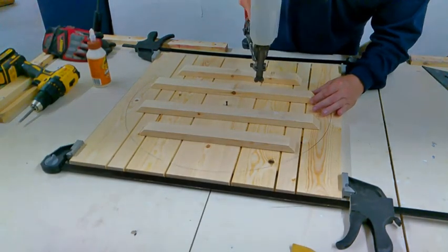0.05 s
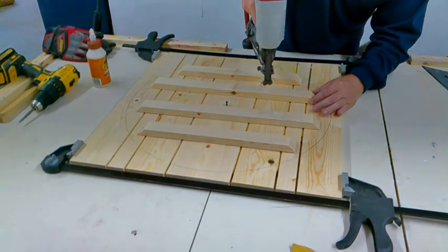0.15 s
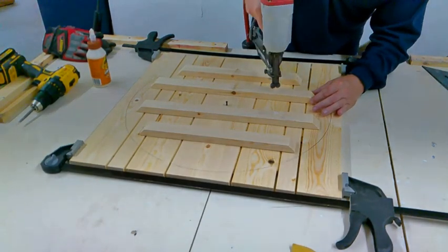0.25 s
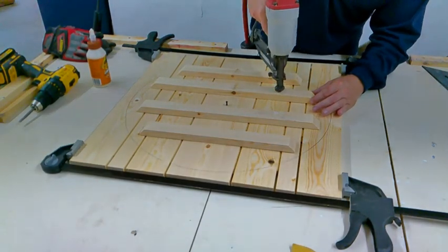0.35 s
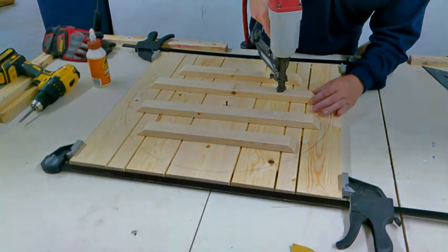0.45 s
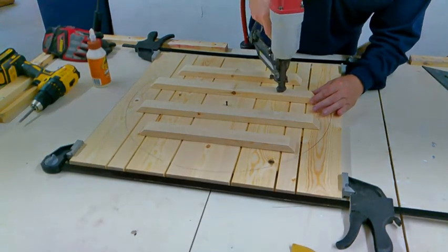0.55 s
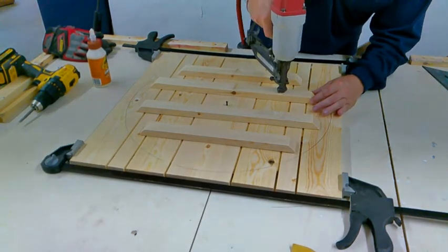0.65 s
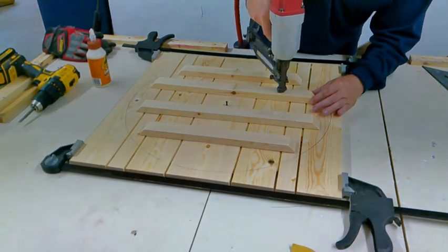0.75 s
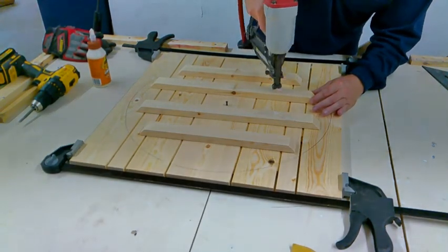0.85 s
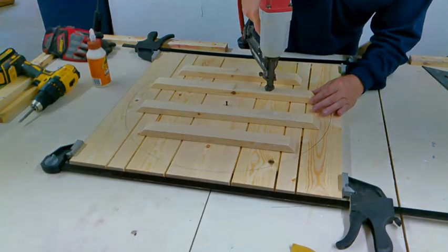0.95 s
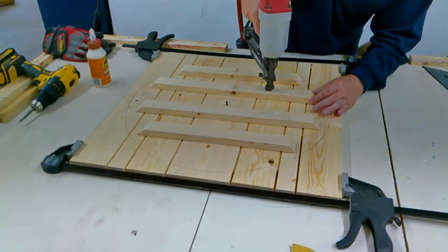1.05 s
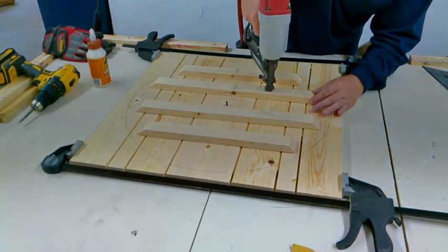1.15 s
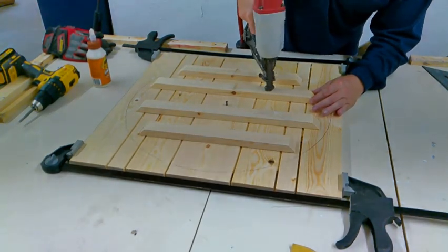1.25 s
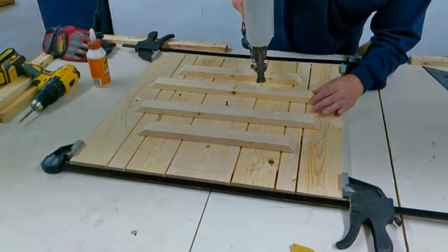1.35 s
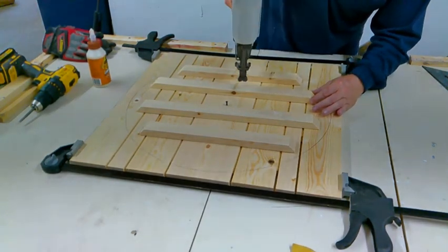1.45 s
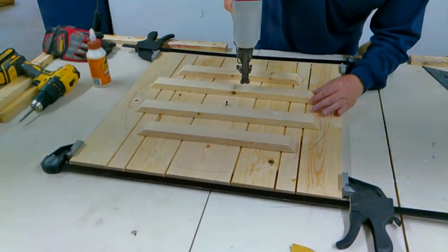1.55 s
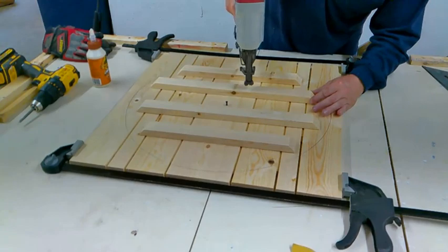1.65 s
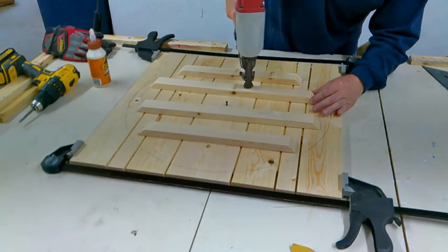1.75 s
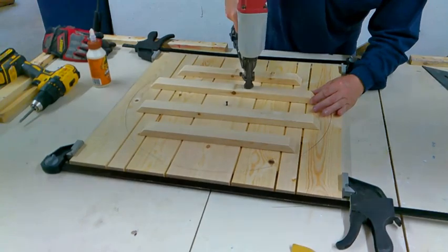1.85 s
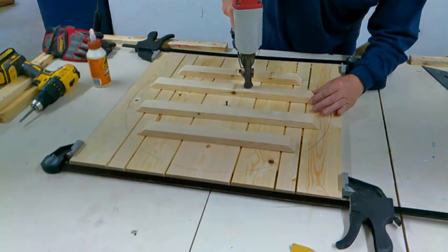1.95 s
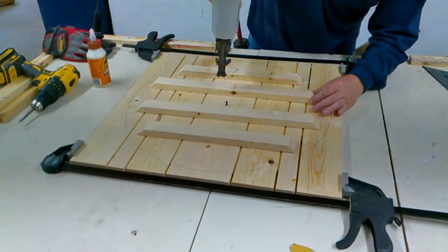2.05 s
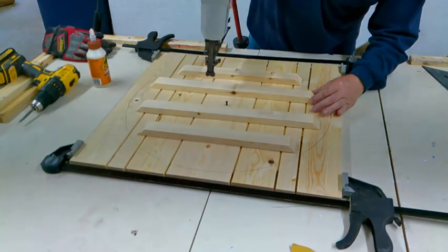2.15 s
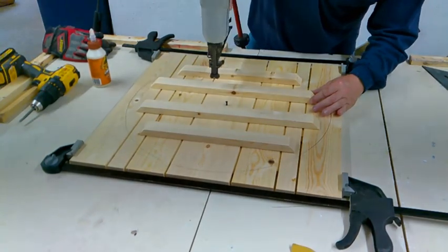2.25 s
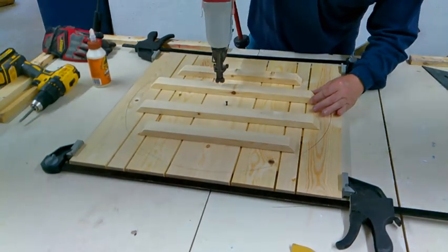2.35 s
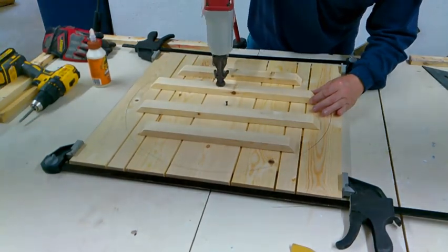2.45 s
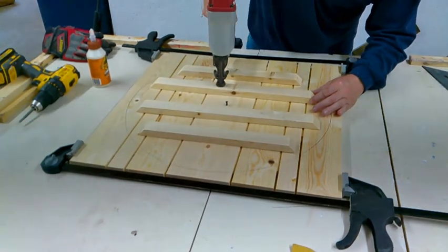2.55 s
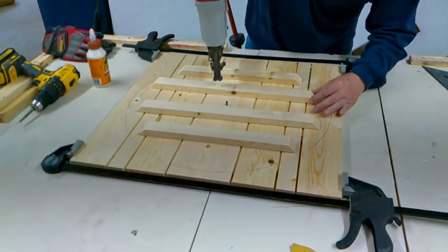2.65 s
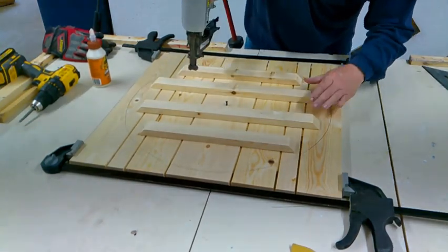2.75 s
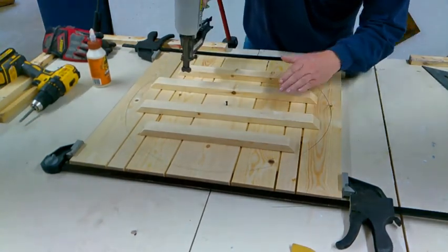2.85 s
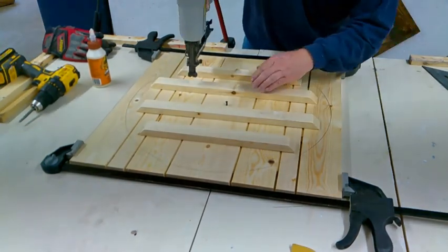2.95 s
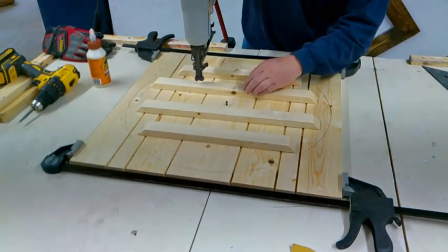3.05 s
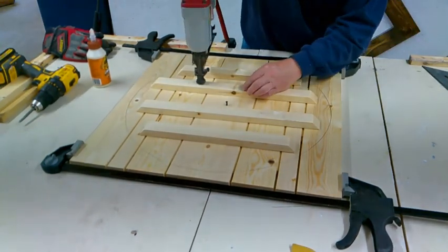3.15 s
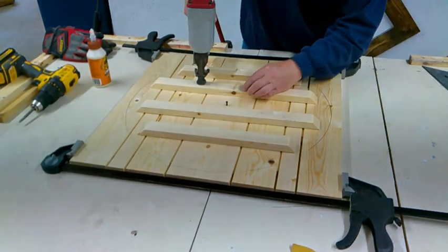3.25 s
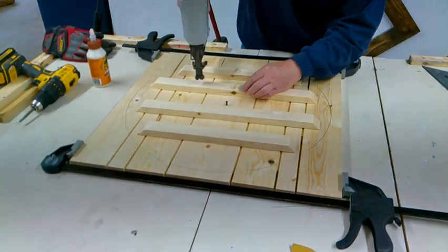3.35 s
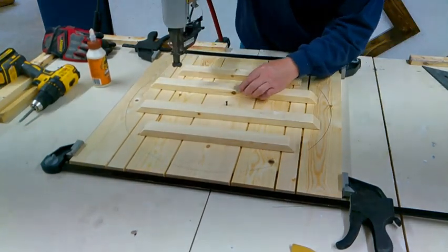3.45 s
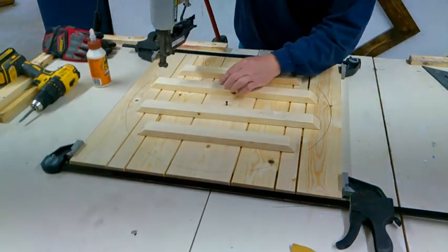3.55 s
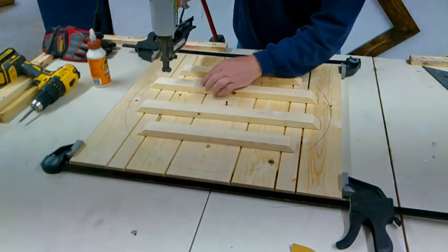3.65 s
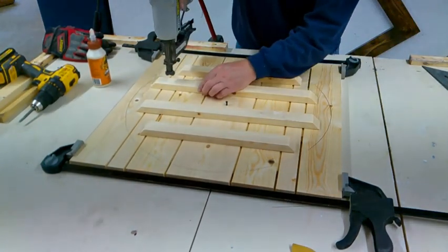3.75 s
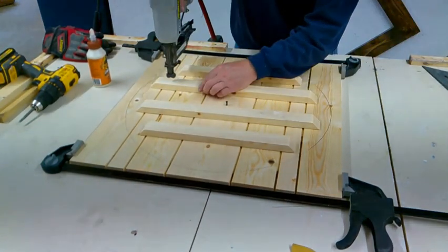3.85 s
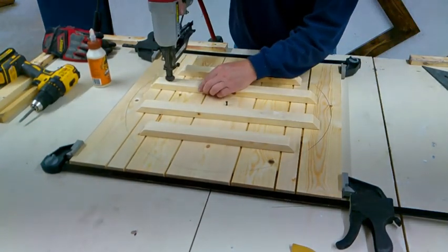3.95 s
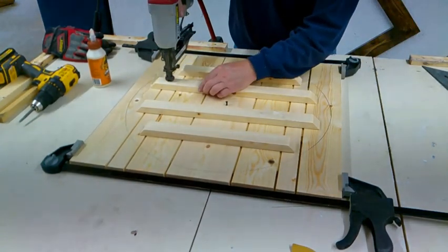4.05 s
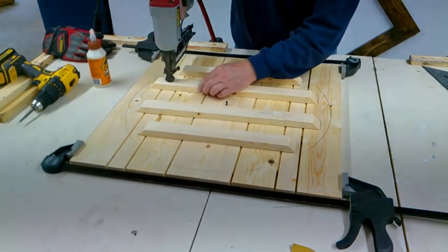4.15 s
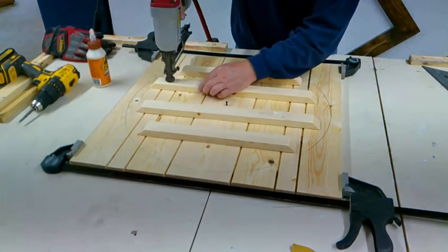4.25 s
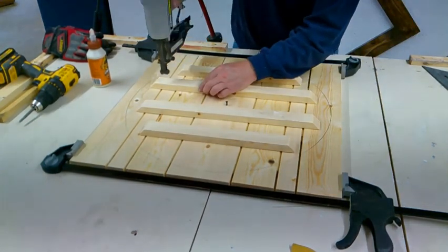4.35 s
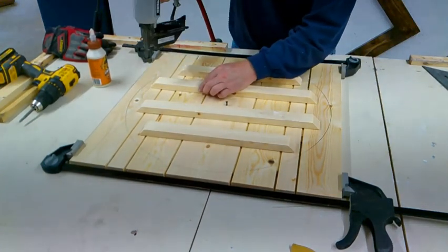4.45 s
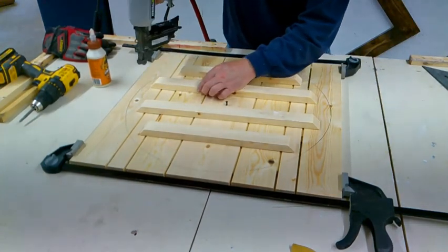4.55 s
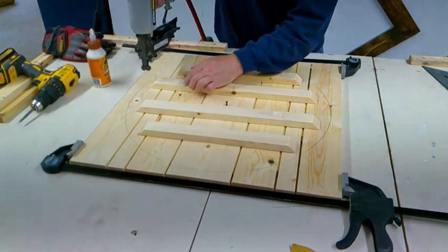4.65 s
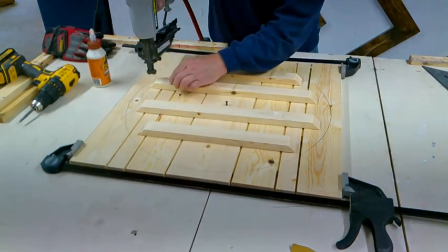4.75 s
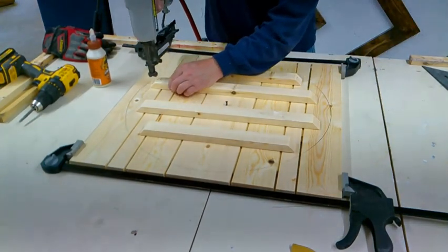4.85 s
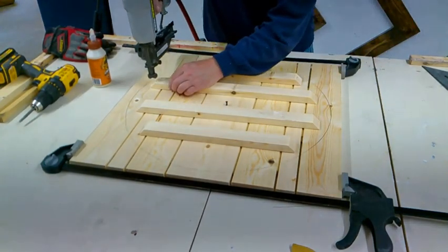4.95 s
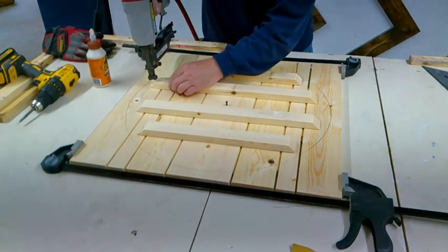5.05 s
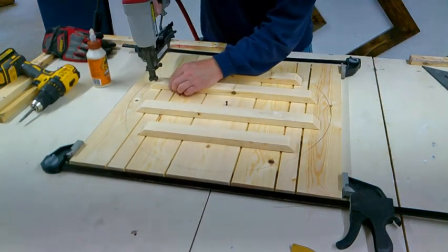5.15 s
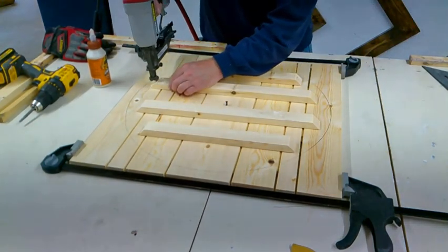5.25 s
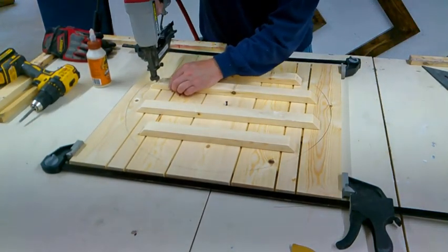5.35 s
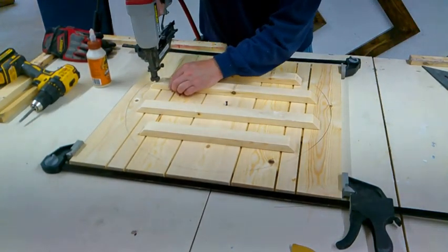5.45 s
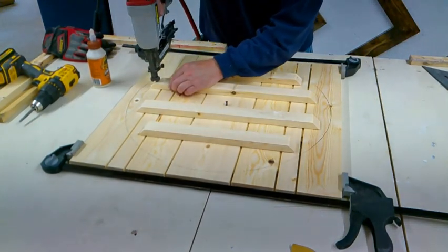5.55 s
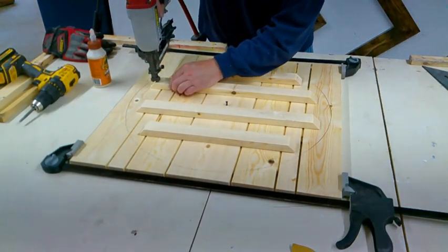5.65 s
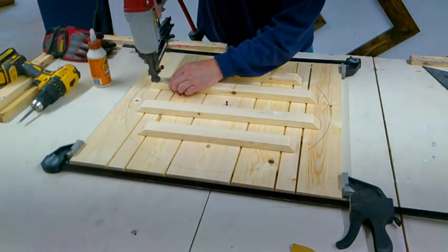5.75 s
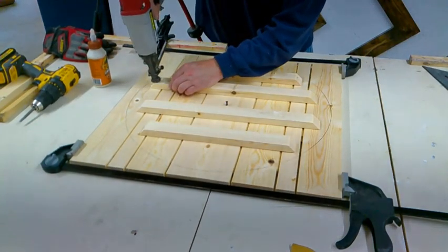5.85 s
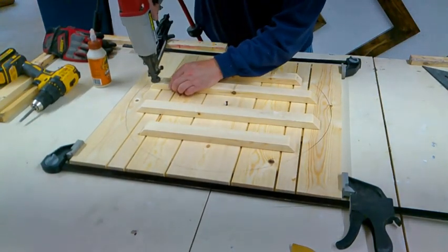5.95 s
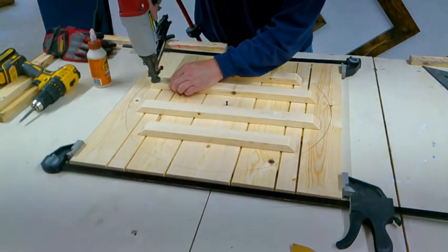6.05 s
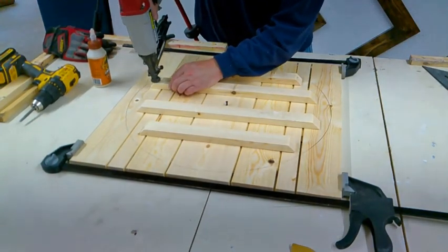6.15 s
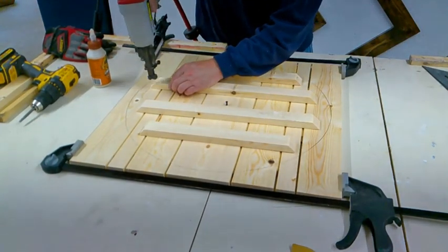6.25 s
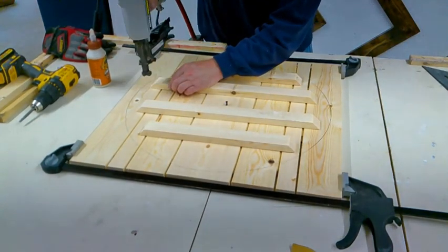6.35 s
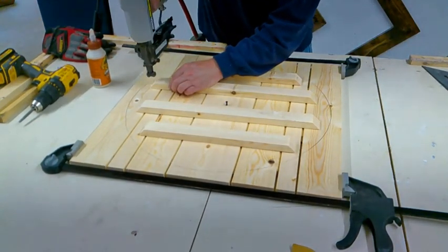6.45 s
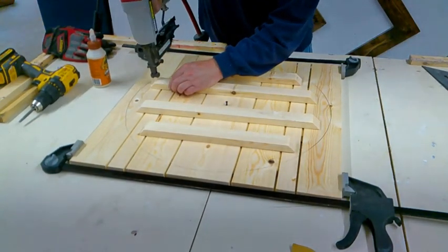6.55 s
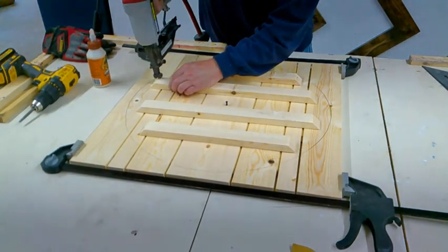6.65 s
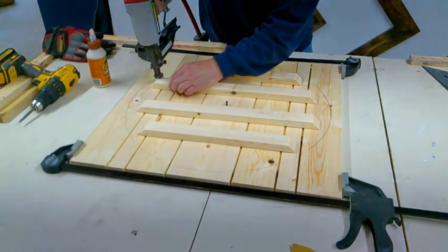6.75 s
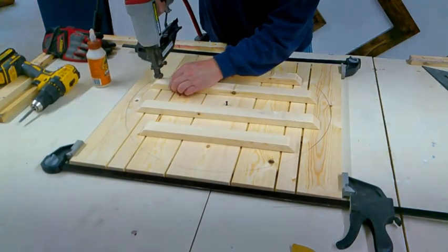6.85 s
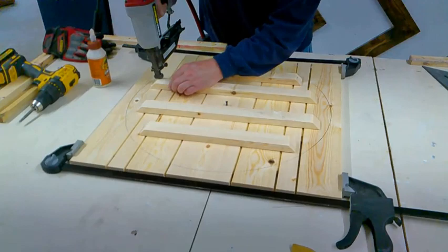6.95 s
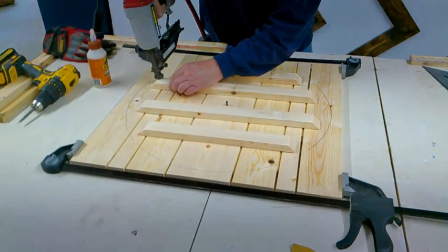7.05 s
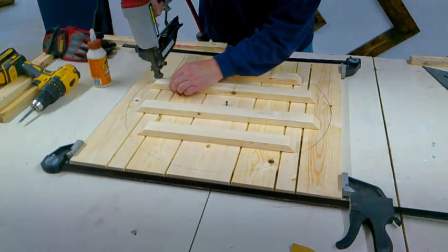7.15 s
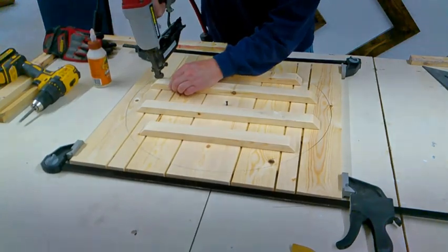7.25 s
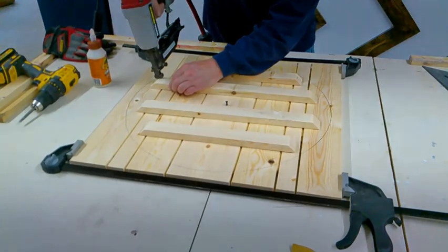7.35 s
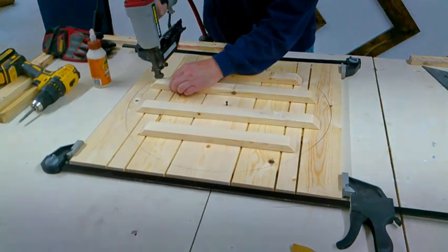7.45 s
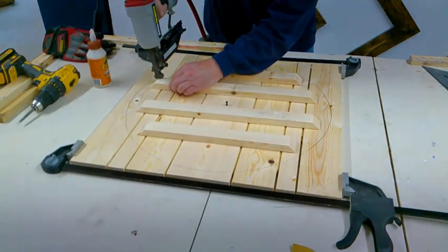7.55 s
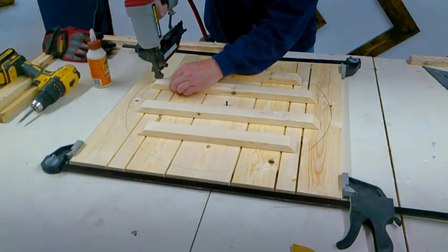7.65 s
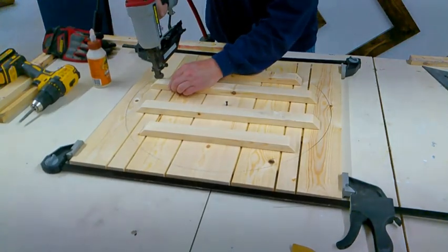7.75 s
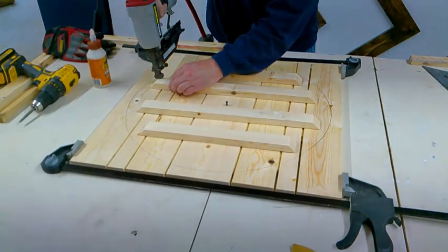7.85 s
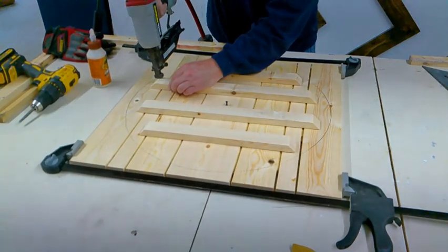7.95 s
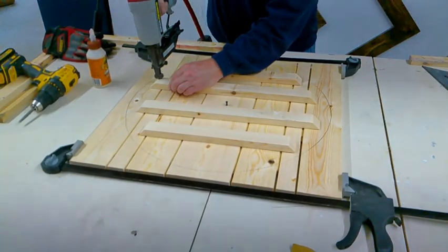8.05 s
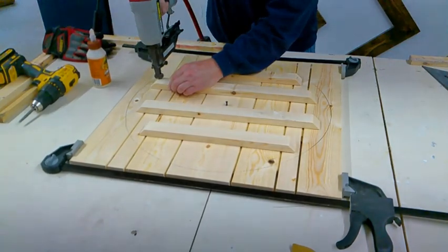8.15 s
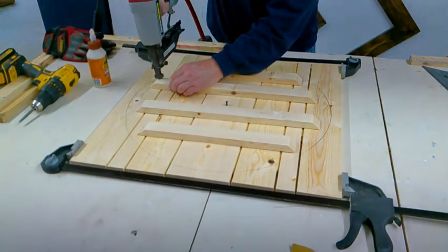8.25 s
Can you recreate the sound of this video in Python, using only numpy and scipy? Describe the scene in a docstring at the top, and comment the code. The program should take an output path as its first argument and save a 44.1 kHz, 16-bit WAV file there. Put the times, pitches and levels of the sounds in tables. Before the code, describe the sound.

Close, distorted nailer shots crack into wooden battens in a hard-walled workshop, with light nose knocks between and metallic clicks at the end.

```python
"""Pneumatic nailer in a workshop

A nailer pins pine battens to a panel on a workbench, close to the microphone, in a hard-walled workshop.
Each shot is a driver blow, a blast of exhaust air and the thump of the returning piston, all overloading the
input: shaped noise bursts, with resonances for the blow and thump. Between shots the nose knocks on the wood,
steel parts click and the bench is softly bumped, over faint mains hum and the rush of the room.
"""
import sys
import numpy as np
from scipy import signal
from scipy.fft import rfft, irfft
from scipy.io import wavfile

SR = 44100
rng = np.random.default_rng(int(sys.argv[2]) if len(sys.argv) > 2 else 0)


def to_wav(s):
    """Save 16-bit WAV."""
    ch = np.atleast_2d(s).T  # columns
    pcm = np.round(np.clip(ch, -1, 1) * 32767)  # PCM
    wavfile.write(sys.argv[1], SR, pcm.astype(np.int16))


N = 365588

# Shots, the first before time zero. Each row: nail entry in seconds, driver blow level in dB,
# time the trigger is held in seconds.
SHOTS = [(-.385, 13, 0.11), (.633, 20.5, .119), (1.170, 20, 0.11), (1.808, 20, .111), (2.487, 20.5, 0.13),
         (3.215, 20, .121), (4.187, 20, .120), (6.075, 24.5, 0.12)]
# The nose set down on the wood. Each row: contact in seconds, relative level in dB, wood note in Hz.
KNOCKS = [(.399, -23.5, 503), (1.729, -6, 333), (2.414, -12.5, 746), (3.138, -10, 784), (3.989, -18.5, 880),
          (4.135, -25.5, 970), (5.14, -31, 425), (5.425, -35.5, 418), (5.62, -38, 340), (6.881, -35.5, 299),
          (7.006, -38.5, 258), (7.188, -20.5, 242)]
# Soft bumps against the bench. Each row: start in seconds, level in dB.
BUMPS = [(7.016, -28), (7.266, -26), (7.533, -31)]
# Trigger, magazine catch and other loose steel. Each row: time in seconds, relative level in dB,
# treble tilt in dB per octave, ring in Hz.
CLICKS = [(.599, -19, -6, 1097), (1.131, -22, -4.5, 1126), (4.020, -25, -2.5, 7100), (5.141, -26, 0, 6140),
          (5.472, -43, -4, 3650), (5.872, -29, 0.5, 8900), (6.965, -31.5, 0, 9530), (7.004, -32, -5, 8000),
          (7.153, -36, -7, 3570), (7.190, 0.5, 3, 7200), (7.585, -39, 1.5, 8400), (7.788, -17, -1, 4020),
          (7.957, -21.5, -3.5, 10450), (8.06, -7, -3, 8730)]

# Resonances. Each row: centre in Hz, width in Hz, level of the resonance in dB relative to its excitation.
PANEL_MODES = [(312.8, 8.1, 1), (480, 14, -7.5), (630, 14, -4), (785, 18, -4.5), (1135.3, 20, -3),
               (1191, 16, -4.5), (1410, 20, 0.5), (1677, 18, -2)]  # pine panel and gun body
STEEL_MODES = [(2120, 260, -4.5), (2760, 150, 0), (3680, 60, 0.5), (4080, 470, 0), (5170, 100, -1),
               (6210, 80, -5), (8400, 230, 3.5), (10600, 200, -4.5)]  # small steel parts
NOSE_MODES = [(1200, 160, -2.5), (2000, 240, 0.5)]  # nose of the gun
# Mode clusters of the magazine spring. Each row: centre in Hz, width in Hz, relative peak level in dB.
SPRING_CLUSTERS = [(2400, 80, 0), (3140, 190, -2.5), (3470, 250, -3), (4324, 220, -1), (5330, 170, -5.5)]

# Noise spectra of the sources. Each row: frequency in Hz, relative level in dB per Hz.
BLOW_SPECTRUM = [(30, -10), (120, -13), (300, -7.5), (480, -7.5), (750, -3), (1120, -1.5), (1500, -3),
                 (2200, -6.5), (2800, -8.5), (4500, -10.5), (9000, -12), (12000, -19), (16000, -33.5)]  # driver blow and nail entry
RETURN_SPECTRUM = [(30, -26.5), (150, -13.5), (480, -13), (750, -1), (1120, 2), (1500, -7), (2100, -3),
                   (2800, -14), (5000, -16), (16000, -29)]  # piston at its top stop
EXHAUST_SPECTRUM = [(100, -28), (1000, -22), (2800, -8.5), (4500, -0.5), (6000, -2), (7200, -0.5),
                    (9000, 1), (12000, 1.5), (14000, -4), (16000, -5.5)]  # vented air jet
KNOCK_SPECTRUM = [(50, -10), (170, -2.5), (330, 3), (600, -1.5), (1100, 0.5), (1600, -3.5), (2200, -6.5),
                  (3500, -8), (7000, -10), (11000, -15.5), (16000, -28)]  # nose on wood
CLICK_SPECTRUM = [(100, -28), (450, -18), (900, -9.5), (1500, -2), (2200, -2.5), (4000, -5), (8000, -1),
                  (11000, -2), (13000, -9.5), (16000, -12.5)]  # steel clicks and head valve
AIR_SPECTRUM = [(25, -3.5), (100, -4), (220, -1), (450, -3), (900, -3), (1600, -9), (4000, -16.5),
                (8000, -20), (16000, -23)]  # soft rush of the room
# Mains hum. Each row: multiple of the mains frequency, level in dB rms.
HUM = [(1, -48.5), (2, -66), (3, -60.5), (5, -66)]
# Workshop reverberation. Each row: band centre in Hz, time to decay by 60 dB in seconds.
ROOM_T60 = [(60, 0.36), (300, 0.46), (1000, 0.43), (2500, 0.45), (5000, 0.42), (9000, 0.35), (15000, .25)]

MAINS_HZ, BENCH_HZ = 60, 147
TOP_HZ = 15700  # upper limit of the recorded band
LEAD = SR // 2  # samples of run-up, so that an earlier shot is still dying away
SPAN = 2 ** 15  # samples in one burst
AGE = np.arange(SPAN) / SR  # time since the start of a burst, s
EXHAUST_DB, RETURN_DB = 19, 15.5  # the same air pressure vents and resets the gun each time
RETURN_S = .031  # the piston's way back up, once the exhaust has opened
FIRM_DB = -17  # knock level that leaves the spectrum untilted
DULLING = 0.087  # tilt in dB per octave for each dB above (brighter) or below (duller) FIRM_DB
TIP_LAG_S, TIP_DB = .002, -6  # click of the safety tip: delay, and level added to the KNOCKS level


def nailer(valve_s=.0115, stroke_s=.014):
    """Pneumatic cycle: valve opens, nail meets wood, stroke ends; on release the gun vents and resets."""
    track = np.zeros(LEAD + N)
    for s, blow_db, held_s in SHOTS:
        release_s = s + held_s
        add(track, s - valve_s, head_valve())
        add(track, s, amp(blow_db) * nail_entry())
        add(track, s + stroke_s, amp(blow_db) * driver_blow())
        add(track, release_s, amp(EXHAUST_DB) * exhaust())
        add(track, release_s + RETURN_S, amp(RETURN_DB) * piston_return())
        add(track, s, spring())
    return track


def driver_blow(t60=0.12, rise_s=0.0021, wet_db=-2):
    """Impact excitation: the nail is driven home, the piston hits its bumper and the panel rings."""
    return ring(burst(BLOW_SPECTRUM, rise_s, t60, wet_db), PANEL_MODES)


def exhaust(t60=0.15, rise_s=0.0027, wet_db=-1.0):
    """Jet noise: the trigger is let go, the cylinder vents and the jet fades as the pressure falls."""
    return burst(EXHAUST_SPECTRUM, rise_s, t60, wet_db)


def piston_return(t60=0.057, rise_s=0.00052, wet_db=-2):
    """Impact excitation: the piston hits its top stop and shakes gun and panel again."""
    return ring(burst(RETURN_SPECTRUM, rise_s, t60, wet_db), PANEL_MODES)


def nail_entry(level_db=-13, t60=0.036, rise_s=0.0014, wet_db=-6):
    """Impact excitation: the point of the nail bites into the batten and excites the panel modes."""
    return amp(level_db) * ring(burst(BLOW_SPECTRUM, rise_s, t60, wet_db), PANEL_MODES)


def head_valve(level_db=4, t60=0.15, rise_s=0.01, wet_db=-2):
    """Flow noise: air rushes into the cylinder and the driver shears a nail off the strip."""
    inrush = burst(CLICK_SPECTRUM, rise_s, t60, wet_db)
    return amp(level_db) * swell(rise_s) * inrush  # the second swell softens the onset further


def spring(level_db=-46, t60=3.7):
    """Light damping: clusters of close coil modes ring far longer than the room."""
    age = np.arange(4 * SPAN) / SR
    hz = np.fft.rfftfreq(len(age), 1 / SR)
    gain = 0
    for centre, width, db in SPRING_CLUSTERS:
        gain = gain + amp(db) / (1 + (2 * (hz - centre) / width) ** 2)
    hiss = rfft(rng.standard_normal(len(age)))
    coils = irfft(hiss * gain)
    return amp(level_db) * coils / coils.std() * fade(t60, age)


def knocks(t60=0.074, note_q=7, note_db=3.5, rise_s=0.0033, wet_db=0, level_db=-2, tip_tilt=1.7):
    """Contact impact: nose meets batten, safety tip clicks; the spot sets the note, the force the brightness."""
    track = np.zeros(LEAD + N)
    for s, db, note_hz in KNOCKS:
        tilt = DULLING * (db - FIRM_DB)
        contact = burst(KNOCK_SPECTRUM, rise_s, t60, wet_db, tilt)
        wood_note = (note_hz, note_hz / note_q, note_db)
        knock = ring(contact, [wood_note, *NOSE_MODES])
        add(track, s - rise_s, amp(db + level_db) * knock)
        add(track, s + TIP_LAG_S, amp(db + TIP_DB) * steel_click(tip_tilt))
    return track


def clicks(ring_q=32, ring_db=5, level_db=4, lead_s=.0018):
    """Resonance of small parts: each catch snaps with a ring of its own."""
    track = np.zeros(LEAD + N)
    for s, db, tilt, ring_hz in CLICKS:
        own_ring = (ring_hz, ring_hz / ring_q, ring_db)
        add(track, s - lead_s, amp(db + level_db) * steel_click(tilt, [own_ring]))
    return track


def steel_click(tilt, modes=(), t60=0.021, rise_s=0.0029, wet_db=-2):
    """Impact excitation: a sprung steel part snaps home with a short crack and a thin ring."""
    return ring(burst(CLICK_SPECTRUM, rise_s, t60, wet_db, tilt), [*STEEL_MODES, *modes])


def bumps(t60=0.054, rise_s=0.0033):
    """Low-pass action of a slow contact: a soft bump wakes only one low note of the bench."""
    track = np.zeros(LEAD + N)
    note = np.sin(2 * np.pi * BENCH_HZ * AGE)
    for s, db in BUMPS:
        add(track, s, amp(db) * swell(rise_s) * fade(t60) * note)
    return track


def background(air_db=-53):
    """Harmonic series and broadband noise: mains hum, mostly odd harmonics, in the soft rush of the room."""
    t = np.arange(N) / SR
    hum = 0
    for multiple, db in HUM:
        cycles = round(multiple) * MAINS_HZ * t + rng.random()
        hum = hum + amp(db) * np.sqrt(2) * np.sin(2 * np.pi * cycles)  # sqrt(2): rms to peak
    return hum + amp(air_db) * noise(AIR_SPECTRUM, size=N)


def burst(spectrum, rise_s, t60, wet_db, tilt=0):
    """Energy balance of a room: it stores a noisy burst as a diffuse echo and decays at each band's own rate."""
    octave = np.log2(np.maximum(np.fft.rfftfreq(SPAN, 1 / SR), 1))
    centres, room_t60s = np.transpose(ROOM_T60)
    colour = rfft(noise(spectrum, tilt=tilt))
    direct = (swell(rise_s) * fade(t60)) ** 2  # energy
    out = 0
    for row, room_t60 in zip(np.eye(len(centres)), room_t60s):
        share = np.interp(octave, np.log2(centres), row)  # overlapping bands that sum to one
        band = irfft(colour * share)
        kept = fade(room_t60, 1 / SR) ** 2  # share of the room's energy left after one sample
        stored = signal.lfilter([1 - kept], [1, -kept], direct)
        energy = direct + amp(wet_db) ** 2 * stored
        out = out + band * np.sqrt(energy)
    return out


def ring(x, modes):
    """Modal superposition: a burst together with the damped resonances that it excites."""
    out = x
    for hz, width, db in modes:
        b, a = signal.iirpeak(hz, hz / width, fs=SR)
        out = out + amp(db) * signal.lfilter(b, a, x)
    return out


def noise(spectrum, size=SPAN, tilt=0):
    """Spectral shaping: unit-rms noise of the given colour, tilted in dB per octave above 200 Hz."""
    hz = np.fft.rfftfreq(size, 1 / SR)
    gain = amp(along(spectrum, hz) + tilt * np.log2(np.maximum(hz, 200)))
    x = irfft(rfft(rng.standard_normal(size)) * gain, size)
    return x / x.std()


def swell(rise_s):
    """Finite contact time: the smooth onset of a contact or of a valve opening."""
    return 1 - np.exp(-(AGE / rise_s) ** 2)


def fade(t60, age=AGE):
    """Exponential damping: a decay by 60 dB in t60 seconds."""
    return np.exp(-np.log(1000) * age / t60)


def along(points, hz):
    """Logarithmic pitch scale: read (Hz, value) points by linear interpolation in log frequency."""
    f, value = np.transpose(points)
    return np.interp(np.log(np.maximum(hz, 1)), np.log(f), value)


def amp(db):
    """Logarithmic level: decibels to amplitude gain."""
    return 10 ** (np.asarray(db) / 20)


def add(track, s, sound):
    """Linear superposition: mix a sound into the track at time s."""
    start = max(int(s * SR) + LEAD, 0)
    part = sound[:max(len(track) - start, 0)]
    track[start:start + len(part)] += part


def scene():
    """Superposition at the microphone: the sum of all sources reaches both channels alike."""
    events = nailer() + knocks() + clicks() + bumps()
    sound = events[LEAD:] + background()
    return np.array([sound, sound])


def record(dry, ceiling=0.61, side_db=-30, side_hz=6000):
    """Input overload: peaks clip flat, the treble gains a little stereo width, and the band is limited."""
    clipped = np.clip(dry, -ceiling, ceiling)
    high_pass = signal.butter(4, side_hz, "high", fs=SR, output="sos")
    treble = signal.sosfilt(high_pass, clipped[0])
    side = amp(side_db) * np.roll(treble, SR // 1000)  # about 1 ms late, opposite in the two channels
    wide = clipped + np.array([side, -side])
    low_pass = signal.ellip(12, .1, 80, TOP_HZ, fs=SR, output="sos")
    return signal.sosfilt(low_pass, wide)


dry = scene()
out = record(dry)
to_wav(out)
```